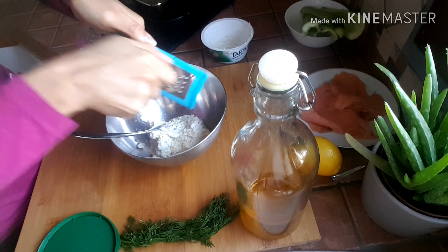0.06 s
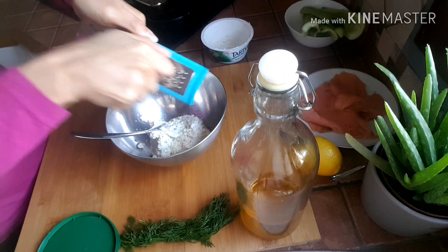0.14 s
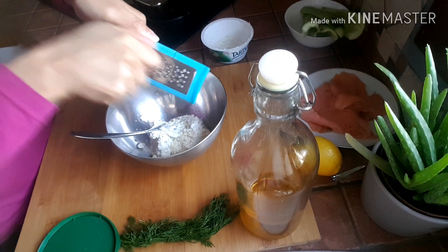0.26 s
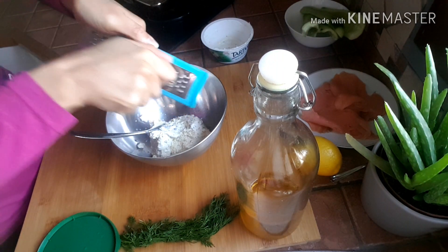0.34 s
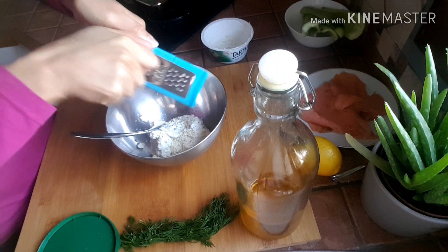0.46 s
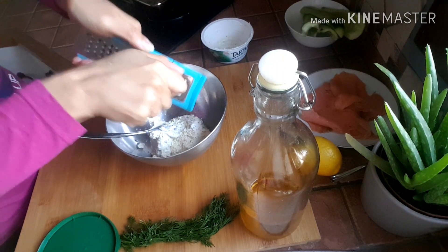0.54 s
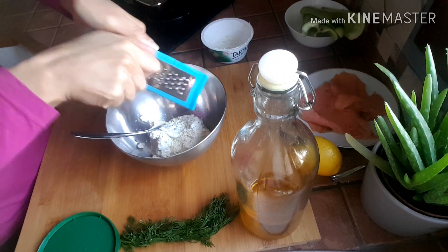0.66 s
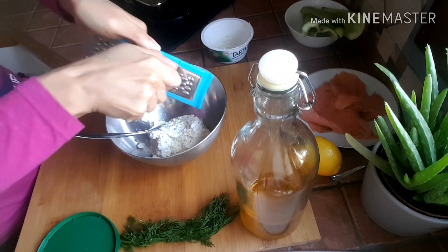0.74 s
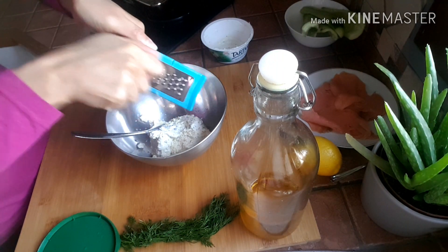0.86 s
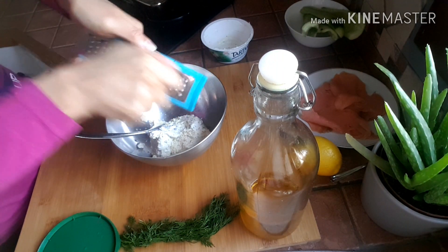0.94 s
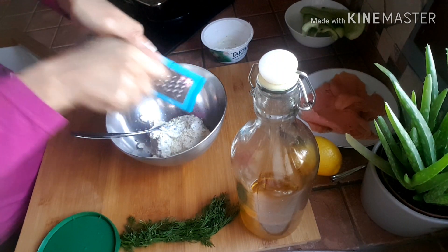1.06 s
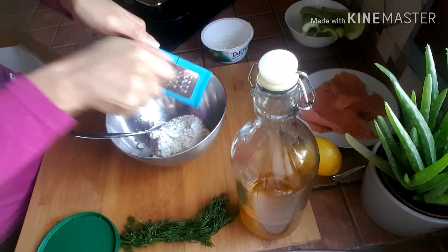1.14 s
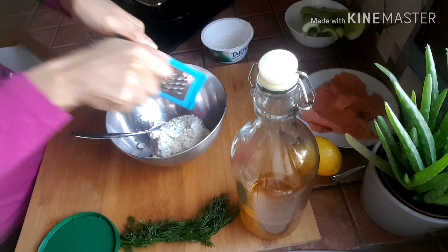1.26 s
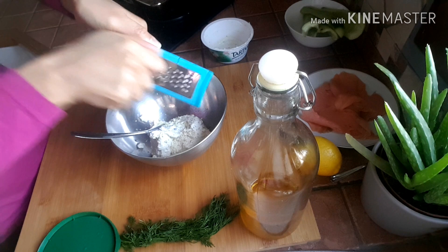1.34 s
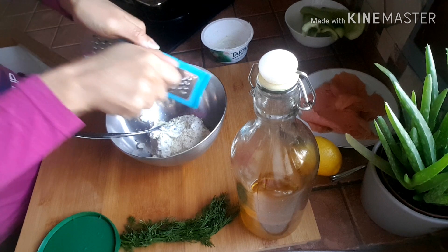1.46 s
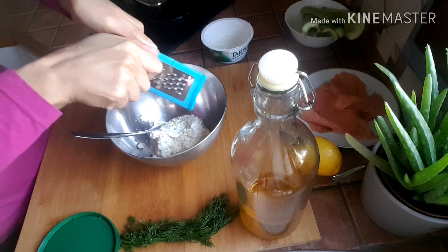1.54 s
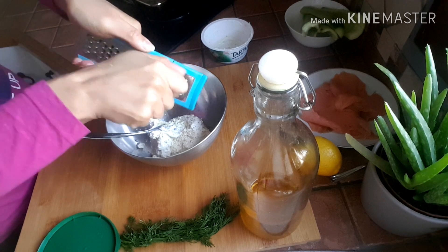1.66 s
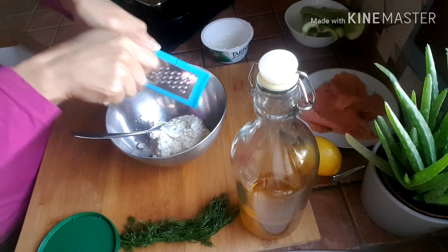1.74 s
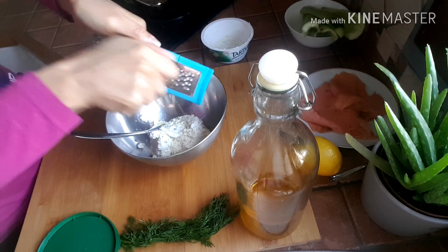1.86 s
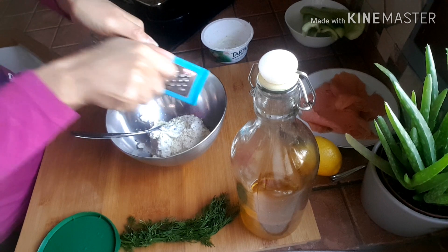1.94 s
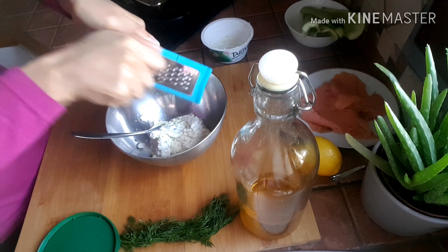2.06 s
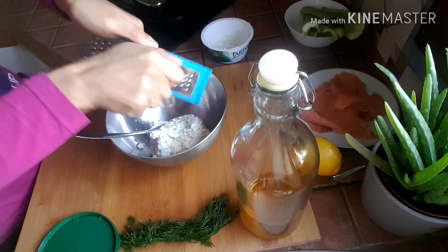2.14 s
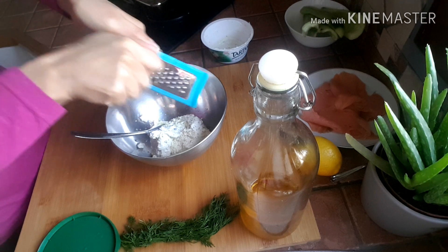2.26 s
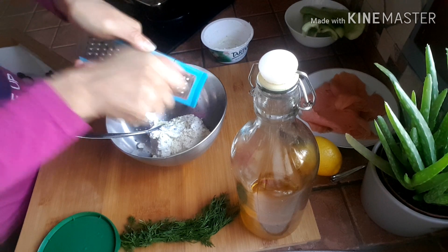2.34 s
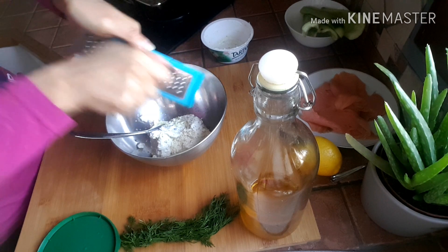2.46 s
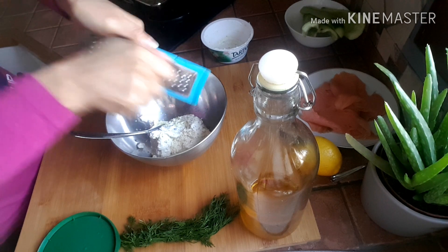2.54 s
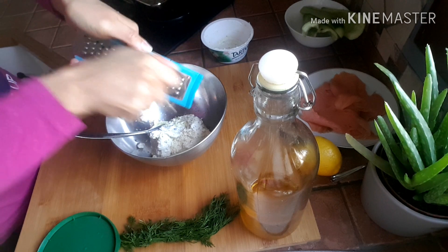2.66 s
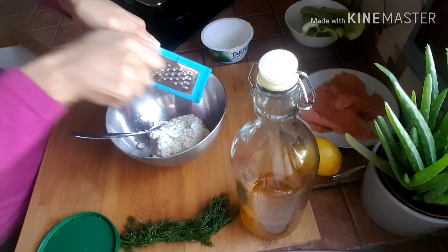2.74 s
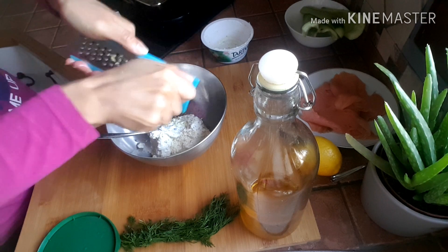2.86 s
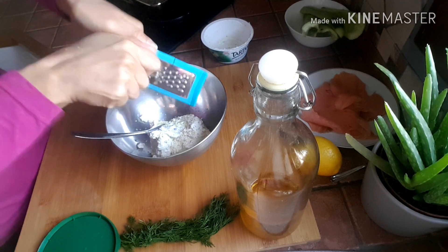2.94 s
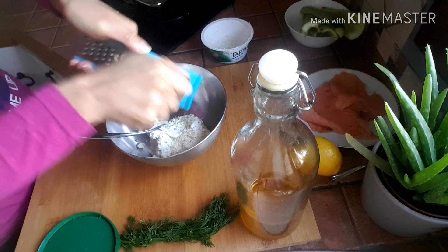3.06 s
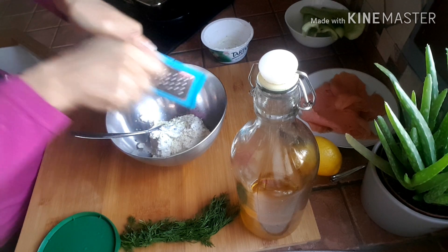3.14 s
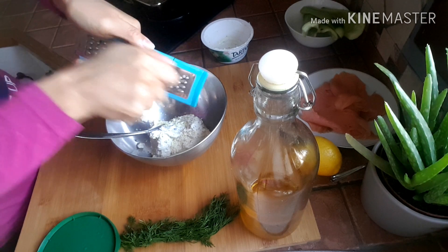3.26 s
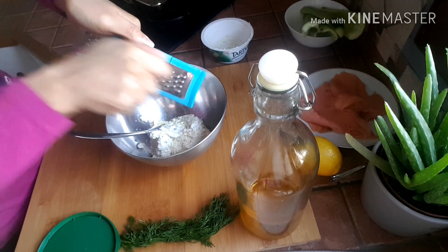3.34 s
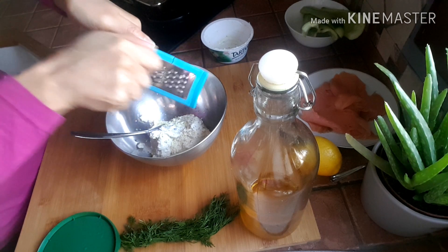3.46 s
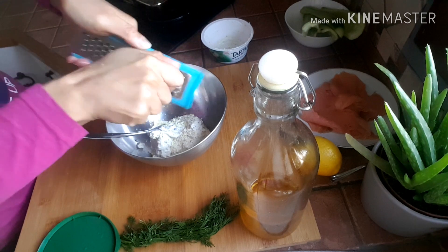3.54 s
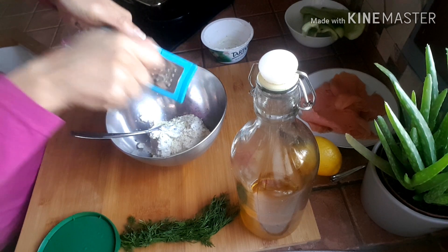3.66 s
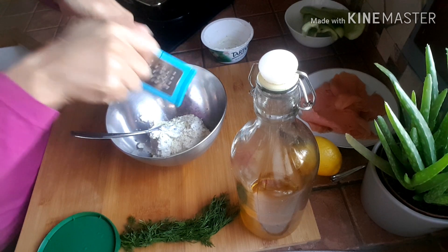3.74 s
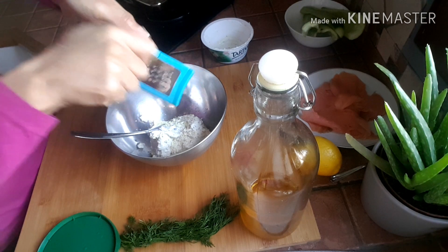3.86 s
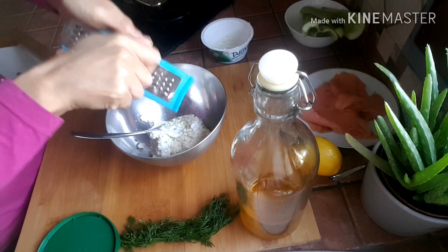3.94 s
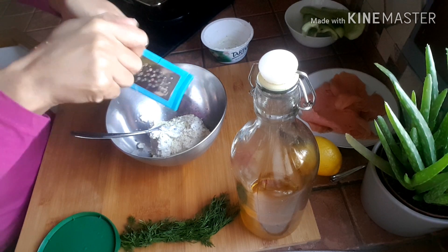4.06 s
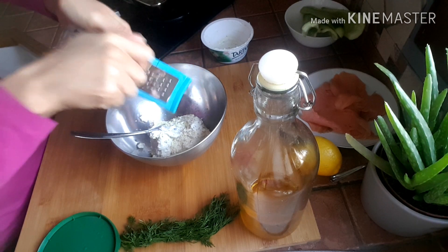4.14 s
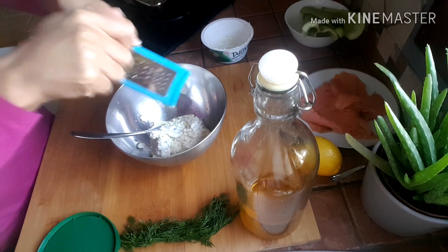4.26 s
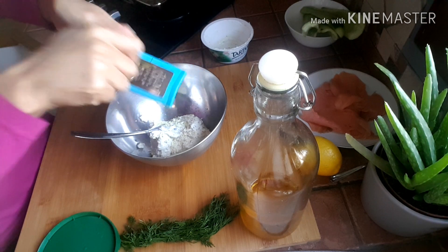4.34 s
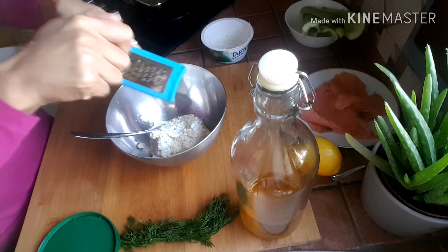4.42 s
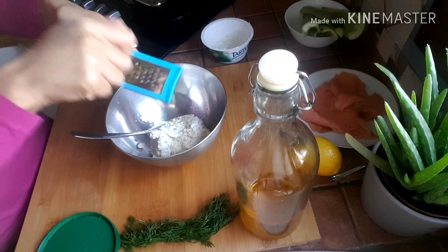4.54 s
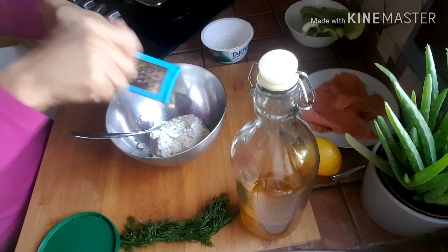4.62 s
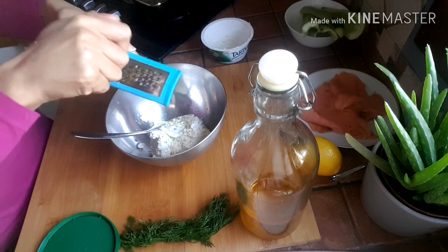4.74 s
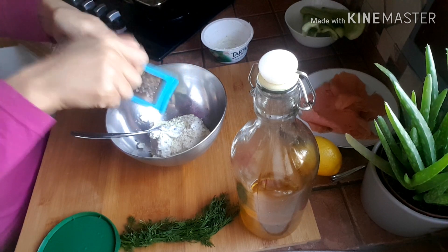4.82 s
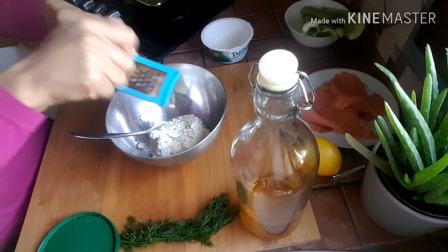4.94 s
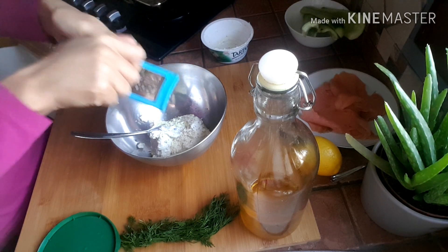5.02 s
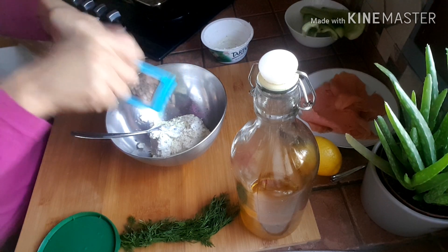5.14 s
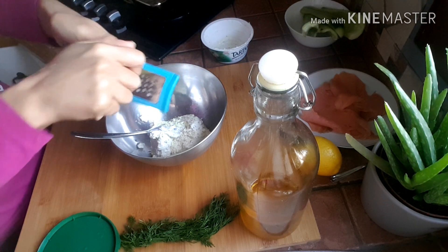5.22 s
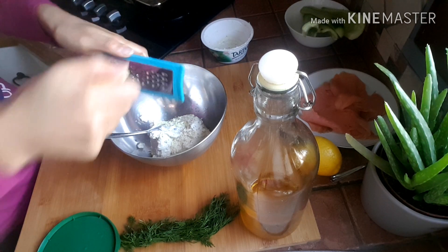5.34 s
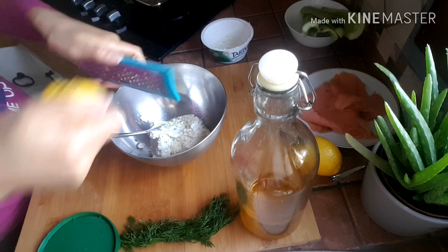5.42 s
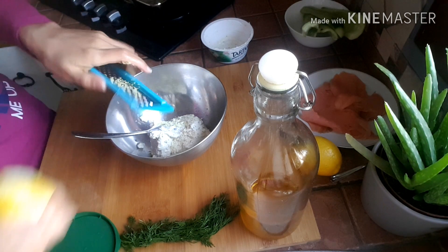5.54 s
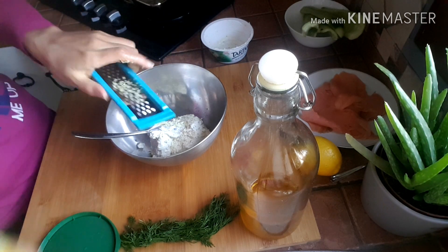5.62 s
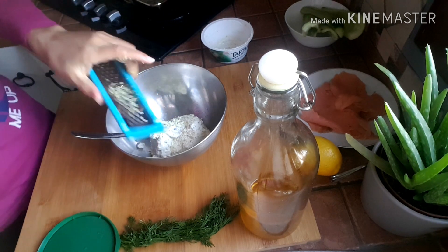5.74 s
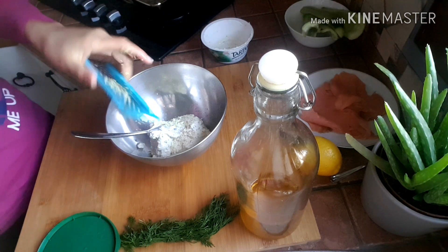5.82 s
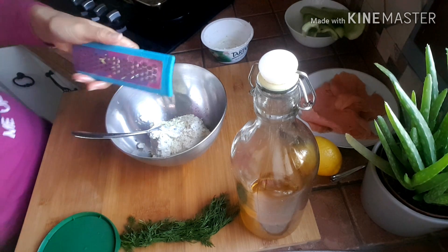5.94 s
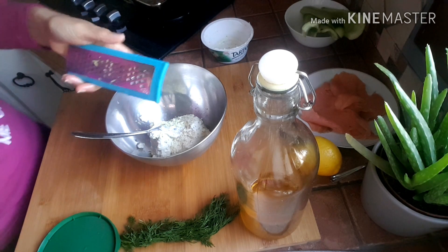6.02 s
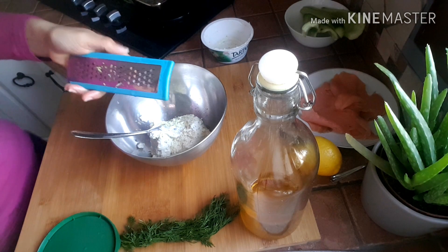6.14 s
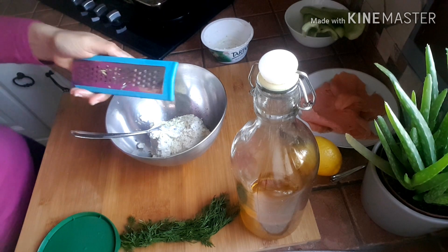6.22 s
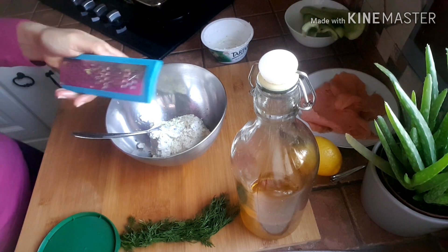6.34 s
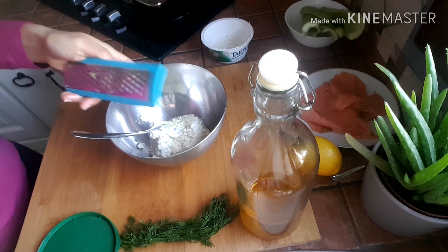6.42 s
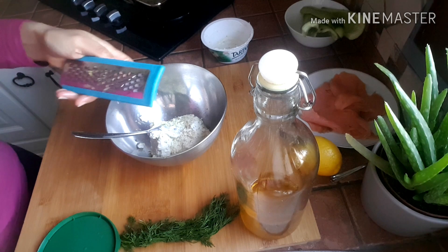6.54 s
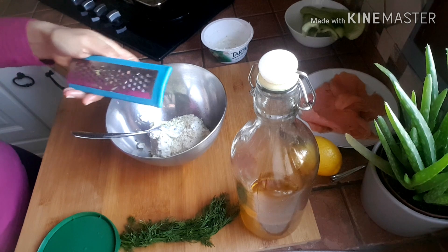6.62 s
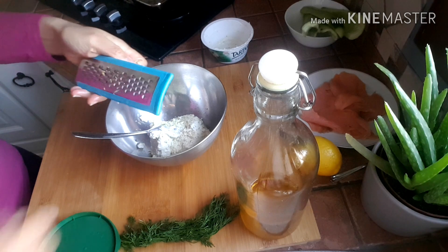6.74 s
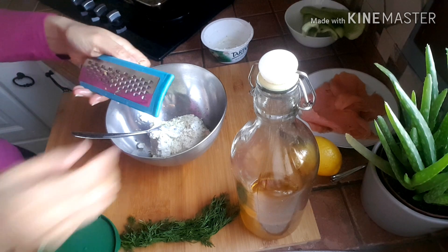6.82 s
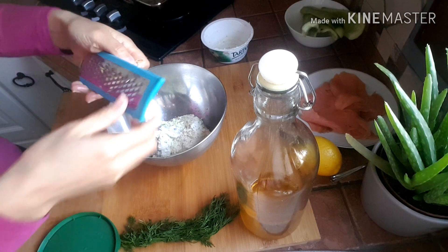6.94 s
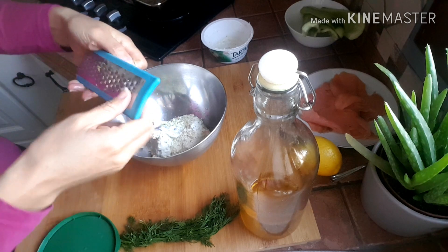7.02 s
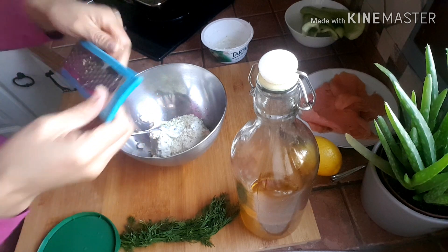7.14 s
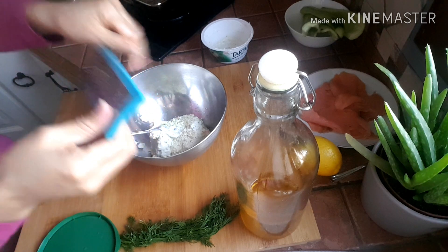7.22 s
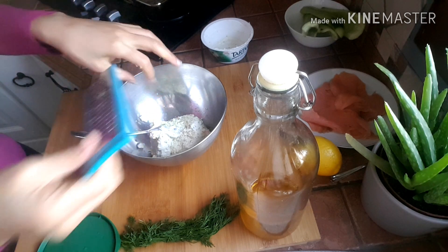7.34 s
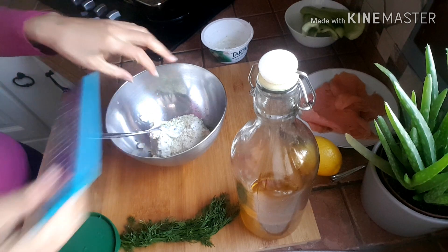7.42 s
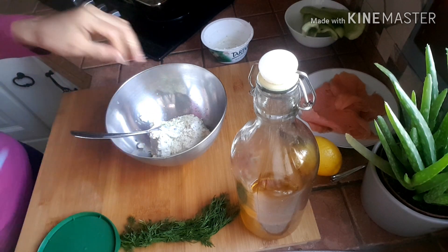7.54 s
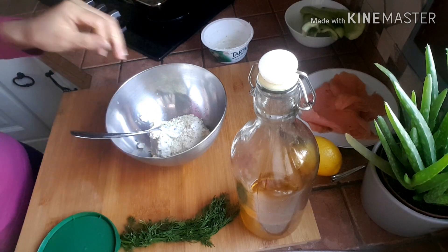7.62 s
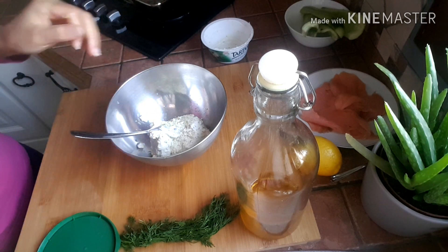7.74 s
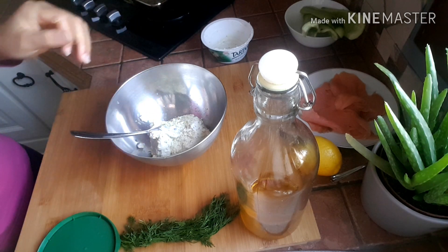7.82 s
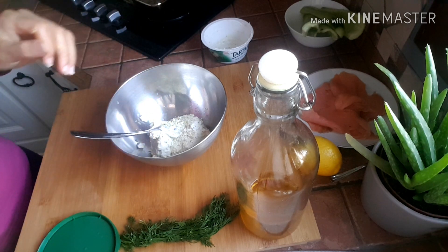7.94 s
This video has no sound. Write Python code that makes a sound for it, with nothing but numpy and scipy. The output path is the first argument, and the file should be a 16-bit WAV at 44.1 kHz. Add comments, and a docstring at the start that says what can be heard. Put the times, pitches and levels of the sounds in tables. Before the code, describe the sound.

Close in a quiet kitchen, a lemon scrapes down a metal hand grater in rapid, gritty strokes, about four a second, with sharp snags. Then light, dry taps knock against the grater at a steady pace. After a short gap the fruit lands on a wooden board with a dull thud and tiny rocking bumps, followed by soft cloth rustle and finger brushes over faint hum.

```python
"""In a quiet kitchen a lemon is pushed down a hand grater over a steel bowl, about four strokes a second. The
rind tears in dense random clicks, with sharper snags, that excite resonances of plate and fruit. The lemon is
then tapped on the grater and put down on a wooden board with a thud: damped modes ring. Cloth rustles as dense,
nearly even clicks, fingers brush the teeth as bands of noise, and an appliance hums as wavering sines over room
noise. Dense, decaying echoes answer the grating, the taps and the thud."""
import sys
import numpy as np
from scipy import signal
from scipy.fft import rfft, irfft
from scipy.io import wavfile

SR = 44100
rng = np.random.default_rng(int(sys.argv[2]) if len(sys.argv) > 2 else 0)


def transcribe(u):
    """Save the signal u as a 16-bit wav file named by the first command-line argument.

    u: samples, shape (n,) or (channels, n), limited to [-1, 1]; the rate is SR.
    q: integer samples, one column per channel.
    """
    v = np.clip(np.atleast_2d(u).T, -1, 1)
    q = np.round(v * 32767).astype(np.int16)
    wavfile.write(sys.argv[1], SR, q)


N = 351918

# left-right correlation of the diffuse sound in the room: frequency_hz, correlation
LIKENESS = [(60, 0.94), (125, 0.84), (250, 0.33), (600, 0.31), (2000, 0.046), (12000, 0.059)]


def amp(db):
    """Level in decibels to amplitude ratio."""
    return 10 ** (np.asarray(db) / 20)


def rms_one(x):
    """Normalisation to unit root-mean-square."""
    return x / np.sqrt(np.mean(x ** 2) + 1e-20)


def at_hz(points, hz):
    """Linear interpolation of a table on a logarithmic frequency axis."""
    table = np.array(points)
    return np.interp(np.log(hz), np.log(table[:, 0]), table[:, 1])


def butter(order, hz, kind="low"):
    """Butterworth filter: a maximally flat passband."""
    return signal.butter(order, hz, kind, fs=SR, output="sos")


def colour(x, spectrum):
    """Minimum-phase filter by the folded cepstrum: nothing sounds early, and white noise keeps its rms."""
    grid_hz = np.linspace(1, SR / 2, 4097)
    cepstrum = irfft(np.log(amp(at_hz(spectrum, grid_hz))))
    cepstrum[1:4096] *= 2
    cepstrum[4097:] = 0
    impulse = irfft(np.exp(rfft(cepstrum)))
    impulse = impulse / np.linalg.norm(impulse)
    return signal.fftconvolve(np.atleast_2d(x), impulse[None], axes=1)[:, :N]


def drift(rate_hz):
    """Slow random fluctuation: white noise through two equal real poles, scaled to unit spread."""
    r = np.exp(-2 * np.pi * rate_hz / SR)
    noise = rng.standard_normal(N + SR)
    return rms_one(signal.lfilter([1], [1, -2 * r, r * r], noise)[SR:])   # the first second settles


def ring(clicks, hz, t60_s):
    """Damped resonator: a unit click starts a decaying sine of unit initial height."""
    r, w = amp(-60 / (t60_s * SR)), 2 * np.pi * hz / SR
    return signal.lfilter([0, np.sin(w)], [1, -2 * r * np.cos(w), r * r], clicks + 1e-18)


def train(times_s, gains):
    """Impulse train: one click at each given time."""
    out = np.zeros(N)
    out[(np.asarray(times_s) * SR).astype(int)] = gains
    return out


def decays(times_s, gains, t60_s):
    """Exponential decay: an envelope that jumps at each time and dies away."""
    return signal.lfilter([1], [1, -amp(-60 / (t60_s * SR))], train(times_s, gains) + 1e-18)


def correlated(mid, side, alike):
    """Sum and difference of independent signals: a stereo pair with the given correlation."""
    return np.sqrt(1 + alike) * mid + np.sqrt(1 - alike) * side * [[1], [-1]]


def tearing(per_s, spread_db, alike):
    """Random impulse noise: uneven clicks at chance times, only partly common to both sides."""
    sizes = amp(spread_db * np.minimum(rng.exponential(1, (2, N)), 4))
    signed = sizes * rng.choice([-1, 1], (2, N))
    mid, side = signed * (rng.random((2, N)) < per_s / SR)
    return rms_one(correlated(mid, side, alike))


def grating():
    """Excitation and resonance: torn rind clicks directly, rings the plate and, duller, the fruit."""
    # spectrum of the rasp, relative: frequency_hz, level_db (per Hz)
    rasp_spectrum = [(530, -31), (900, -5.5), (1400, 0), (2000, -2.5), (2800, -2), (3800, -4.5), (4800, -9),
                     (6000, -1), (7400, -5), (8200, -5.5), (9200, -19.5), (10500, -15), (13000, -11.5),
                     (14300, -11), (15300, -57), (16000, -30)]
    # spectrum of the fruit's body, relative: frequency_hz, level_db (per Hz)
    fruit_spectrum = [(90, -11.5), (170, -4.5), (300, -9.5), (500, -3.5), (900, 1), (1400, -5.5),
                      (2200, -9)]
    rasp, dug, body = strokes()
    rows_of_teeth = amp(1.8 * drift(90))   # pressure jumps as the rind rides over the rows
    clicks = tearing(per_s=7000, spread_db=2, alike=0.17) * rows_of_teeth
    torn = rasp * clicks + snags()
    rasping = colour(torn + plate(torn), rasp_spectrum)
    lower = signal.sosfilt(butter(1, 1900), rasping)
    dug_rasp = rasping + (dug - 1) * lower
    fruit = colour((body * clicks).mean(axis=0), fruit_spectrum)
    return dug_rasp + amp(6) * fruit


def strokes():
    """Force envelopes of rasp, its lower part and the fruit: bite, stall, push, release, light return."""
    # strokes; levels before the resonances, the last one reached as the turn begins:
    # start_s, push_s, bite_db, push_end_db, stall_db (against the push), return_start_db, return_end_db
    stroke_rows = [(-0.13, 0.067, -45, -33, 0, -46.5, -51.5), (0.088, 0.033, -36, -41, -0.5, -57.5, -63),
                   (0.321, .04, -35.5, -37.5, -5, -52.5, -62), (0.54, 0.05, -38.5, -31.5, -1.5, -58, -56),
                   (0.752, 0.033, -36.5, -33, -13, -53, -62), (0.972, 0.052, -50.5, -35, -0.5, -53, -55.5),
                   (1.183, .046, -41, -36, -13, -67, -60.5), (1.414, .058, -38.5, -33, -4, -54, -60),
                   (1.647, 0.05, -47, -33.5, -0.5, -73, -52.5), (1.85, 0.068, -41.5, -35, -11, -46.5, -60),
                   (2.119, .052, -44.5, -32.5, -12.5, -57, -58),
                   (2.364, .06, -43.5, -34.5, 0, -51.5, -54.5), (2.59, 0.062, -38, -35, -2, -54.5, -53.5),
                   (2.811, 0.077, -43.5, -37, 2.5, -53.5, -53.5), (3.044, 0.068, -48, -37, 1, -58, -54),
                   (3.272, 0.055, -40.5, -39, 2.5, -62, -57.5),
                   (3.49, 0.093, -51.5, -38.5, -0.5, -42.5, -80.5)]
    last_return_end_s = 3.867
    bite_s, release_db_per_s = 0.0059, 534   # the push bites at once and lets go quickly
    turn_s, turn_db = 0.075, -8   # the hand stops to turn before each push, and the return fades
    stall_share = 0.69   # the fruit sticks this far into the push, then jerks on
    dig_db, dig_s = -4.5, 0.018   # the teeth first skim the rind: the lower rasp comes in late
    body_push_db, body_return_db = -9, -4.5   # body of the fruit against the rasp
    t, push, back, dug = np.arange(N) / SR, np.zeros(N), np.zeros(N), np.ones(N)
    nexts = [row[0] for row in stroke_rows[1:]] + [last_return_end_s]
    for row, following in zip(stroke_rows, nexts):
        s, length, bite_db, end_db, stall_db, back_db, last_db = row
        end = s + length
        at = (t >= s) & (t < following)
        now = t[at]
        pressed_db = np.interp(now, [s, end], [bite_db, end_db])
        pressed_db += np.interp(now, [s, s + stall_share * length, end], [0, stall_db, 0])
        pressed_db -= release_db_per_s * np.maximum(now - end, 0)
        push[at] = amp(pressed_db) * np.minimum((now - s) / bite_s, 1)
        back_times = [s, end, following - turn_s, following]
        back[at] = amp(np.interp(now, back_times, [last_db, back_db, last_db, last_db + turn_db]))
        dug[at] = amp(dig_db * np.exp((s - now) / dig_s))
    body = dug * (amp(body_push_db) * push + amp(body_return_db) * back)
    return push + back, dug, body


def snags():
    """Stick and slip: a row of teeth bites and lets go in a sharp click with a short decaying tear."""
    # snags, before the plate rings: time_s, level_db, treble_db (against level_db)
    snag_rows = [(0.0773, -42, 2), (0.0963, -26.5, 5), (0.119, -33, 1), (0.3143, -42.5, 2),
                 (0.3284, -31.5, -2.5), (0.3573, -37, 11), (0.3616, -21, -7.5), (0.5462, -34, -4),
                 (0.5824, -31.5, 9.5), (0.7562, -38, 3), (0.785, -26, 2), (0.974, -44.5, 5),
                 (1.003, -37, 6), (1.0195, -27, 1), (1.109, -36.5, -6), (1.193, -36, -14),
                 (1.222, -30, -12), (1.407, -34, -4), (1.4232, -33, 9), (1.4671, -37, -3), (1.6617, -34, 4),
                 (1.7, -34.5, 11.5), (1.857, -34.5, 6.5), (1.902, -25, -8), (1.914, -29.5, 8),
                 (1.9522, -39, 7), (2.1252, -36.5, -22), (2.1681, -33, 10.5), (2.3699, -36, -3),
                 (2.4, -36, -1), (2.593, -31, 6), (2.6559, -35, 10), (2.814, -45, -6), (2.845, -32, 8),
                 (3.055, -37, -11), (3.277, -46, 1), (3.292, -24, 1), (3.3327, -31, 4), (3.496, -39, -9),
                 (3.5291, -28, -8), (3.5431, -23, 3), (3.576, -29.5, 3), (3.59, -29, 0)]
    t60_s = 0.013
    s, level_db, treble_db = np.transpose(snag_rows)
    pan_db = 4.5 + 5 * rng.standard_normal(len(s))   # left over right: where on the plate is chance
    snap = tearing(per_s=29000, spread_db=5, alike=1)
    snap[:, (s * SR).astype(int)] = 1.77   # the letting go is one sharp click
    dull = signal.sosfilt(butter(2, 4800), snap)
    bright = snap - dull
    sides = []
    for k, way in enumerate([1, -1]):
        side_db = level_db + way * pan_db / 2
        dull_part = dull[k] * decays(s, amp(side_db), t60_s)
        bright_part = bright[k] * decays(s, amp(side_db + treble_db), t60_s)
        sides.append(dull_part + bright_part)
    return np.array(sides)


def plate(torn):
    """Modal superposition: plate modes of alternating sign, each with a half-power width."""
    # modes of the toothed plate: frequency_hz, width_hz, level_db (relative)
    plate_modes = [(1370, 200, -9), (1950, 200, -7), (2350, 180, -8), (2780, 200, -4), (3300, 250, -7),
                   (3950, 250, -6), (5370, 400, -5), (6300, 400, -7), (7280, 350, -9), (10700, 500, -6),
                   (12300, 500, -8)]
    out = 0
    for k, (hz, width_hz, level_db) in enumerate(plate_modes):
        free = amp(level_db + 4 * drift(6))   # the moving fruit damps now one mode, now another
        t60_s = np.log(1000) / np.pi / width_hz
        out = out + (-1) ** k * 2 * np.pi * width_hz / SR * ring(free * torn, hz, t60_s)
    return out


def struck(s, level_db, treble_db, modes, knee_hz, longest_s):
    """Modal excitation: each blow strikes each mode by chance; treble_db weights the high modes."""
    luck_db = rng.normal(0, 1.5, (len(s), len(modes)))
    out = np.zeros((2, N))   # low modes, high modes
    for k, (hz, mode_db, t60_s) in enumerate(modes):
        high = int(hz > knee_hz)
        gains = amp(level_db + mode_db + luck_db[:, k] + high * treble_db)
        blows = train(s, -gains * (-1) ** (k * high))
        out[high] += ring(blows, hz, min(t60_s, 0.015 if high else longest_s))
    return out


def taps():
    """Impact: the rind knocks on the frame: short modes, one sharp click and a little grit after it."""
    # taps, before modes and filters: time_s, level_db, treble_db (against level_db); the last row is no knock
    # but a faint, bright tick that sounds with the scratch of the teeth at 5.42 s
    tap_rows = [(3.838, -45.5, -22), (3.992, -35, -15), (4.162, -38, -18.5), (4.348, -32, -9.5),
                (4.526, -32.5, -17), (4.701, -29.5, -14), (4.873, -31, -10.5), (5.041, -34, -12),
                (5.213, -31, -5.5), (5.425, -59.5, 6)]
    # modes of the frame, undamped by the hand: frequency_hz, level_db (relative), t60_s
    frame_modes = [(344, -15, 0.046), (467, 2, 0.054), (830, 8, 0.0045), (1295, 5, 0.031),
                   (1580, -8, 0.011), (2454, 7, 0.031), (3030, 1.5, 0.02), (3500, 2, 0.006),
                   (4830, -18, 0.0066), (5700, -4, 0.01)]
    # spectrum of click and grit, relative: frequency_hz, level_db (per Hz)
    crack_spectrum = [(150, -14), (600, -6.5), (3000, 0.5), (7000, -11), (9200, -20.5), (12000, -16),
                      (16000, -46)]
    s, level_db, treble_db = np.transpose(tap_rows)
    grit = rng.standard_normal(N) * decays(s, amp(level_db + treble_db + 1), 0.025)
    click = train(s, -amp(level_db + treble_db + 9))
    # the hand damps the frame, so no mode outlasts longest_s
    modes = struck(s, level_db - 16, treble_db + 8.5, frame_modes, knee_hz=2000, longest_s=0.035)
    return modes.sum(axis=0) + colour(click + grit, crack_spectrum)[0]


def thud():
    """Contact time: the squashing fruit smooths the low modes; weaker blows are softer, so duller."""
    # lemon lands on the board and rocks, before the modes: time_s, level_db
    thud_rows = [(6.3809, -21.5), (6.3933, -23.5), (6.413, -31), (6.433, -37), (6.45, -37.5), (6.478, -43),
                 (6.512, -43), (6.544, -54), (6.58, -55), (6.652, -59)]
    # modes of the board, before the limit on decay: frequency_hz, level_db (relative), t60_s
    board_modes = [(90.4, -16, 0.25), (173, -6.5, 0.041), (246, 3.5, 0.018), (360, 2, 0.023),
                   (470, -4, 0.022), (695, -9.5, 0.017), (1010, -10.5, .02), (1340, -8.5, 0.0098),
                   (1640, -8.5, 0.011), (2100, -11, 0.0052)]
    s, level_db = np.transpose(thud_rows)
    hardness_db = 2.1 * (level_db - level_db[0])
    low, high = struck(s, level_db - 3.5, hardness_db, board_modes, knee_hz=500, longest_s=0.19)
    squash = np.hanning(round(0.0032 * SR))   # the length of the contact
    swollen = signal.lfilter(-squash / squash.sum(), [1], low)
    swollen = signal.sosfilt(butter(2, 85, "high"), swollen)   # a small board radiates little deep bass
    burst = rng.standard_normal(N) * decays(s, amp(level_db + hardness_db - 16.5), 0.074)
    crack = signal.sosfilt(butter(4, [600, 2500], "band"), burst)
    return swollen + high + crack


def rustle():
    """Friction noise: cloth and skin click at random under a moving level; the fruit scrapes on the board."""
    # cloth and skin moving, mean level: time_s, level_db
    rustle_rows = [(3.7, -75.5), (4.1, -68), (5.3, -77), (5.55, -70.5), (5.72, -72.5), (5.8, -66),
                   (5.87, -64), (6.1, -82), (6.37, -73), (6.5, -63.5), (6.7, -66.5), (7.0, -70),
                   (7.05, -79), (7.98, -74)]
    # scuffs of the fruit scraping on the board as it settles: time_s, level_db
    scuff_rows = [(6.432, -58), (6.449, -56.5)]
    # spectrum of cloth, relative: frequency_hz, level_db (per Hz)
    cloth_spectrum = [(300, -6.5), (700, -3), (2000, -4), (2700, -5.5), (3400, -11.5), (6000, -19.5),
                      (10000, -23)]
    s, level_db = np.transpose(rustle_rows)
    gain = amp(np.interp(np.arange(N) / SR, s, level_db, left=-90) + drift(1.6))
    s, level_db = np.transpose(scuff_rows)
    gain = gain + decays(s, amp(level_db), 0.13)
    return gain * colour(tearing(per_s=6000, spread_db=0.5, alike=0.055), cloth_spectrum)


def brushes():
    """Band-limited noise: fingers and rind brush the teeth in dying bursts of at most 0.2 s."""
    # brushes, before the band filter: time_s, level_db (3.5 dB above the burst), centre_hz, t60_s
    brush_rows = [(3.804, -62, 8500, 0.023), (3.899, -53.5, 8000, 0.046), (4.163, -50, 7450, 0.19),
                  (4.378, -51.5, 8000, 0.11), (5.154, -54, 5500, 0.022), (5.424, -46, 4050, 0.22),
                  (6.435, -56, 3500, 0.13), (7.128, -62, 6000, .05), (7.14, -54, 5550, .06),
                  (7.224, -62, 6500, .06), (7.268, -56.5, 6200, 0.074), (7.284, -63, 7500, 0.04),
                  (7.42, -56, 9570, .04)]
    out = np.zeros((2, N))
    noise = rng.standard_normal((2, N))
    for s, level_db, hz, t60_s in brush_rows:
        at = slice(int(s * SR), int((s + 0.2) * SR))
        band = signal.sosfilt(butter(1, [hz / 1.35, hz * 1.35], "band"), noise[:, at])
        out[:, at] += band * decays([s], amp(level_db - 3.5), t60_s)[at]
    return out


def kitchen(x):
    """Reverberation: octave bands of noise rise in about a millisecond and decay, alike in the bass."""
    # reverberation time: frequency_hz, t60_s
    reverberation = [(60, 0.15), (500, 0.35), (2000, 0.26), (6000, 0.19), (14000, 0.1)]
    t, out = np.arange(SR // 2) / SR, 0
    mid, side = rng.standard_normal((2, SR // 2))
    for low_hz in 40 * 2. ** np.arange(9):
        centre_hz = low_hz * 2 ** .5
        both = correlated(mid, side, at_hz(LIKENESS, centre_hz))
        band = signal.sosfilt(butter(2, [low_hz, 2 * low_hz], "band"), both)
        out = out + band * amp(-60 * t / at_hz(reverberation, centre_hz))
    out = out * np.minimum(t / 0.0011, 1)
    return signal.fftconvolve(x[None], out / np.linalg.norm(out[0]), axes=1)[:, :N]


def hum():
    """Narrow-band tones: an appliance's sines waver in level and phase."""
    # tones of the appliance, mean level: frequency_hz, level_db
    hum_tones = [(102.3, -70), (123.8, -79.5), (247.6, -76.5), (296.1, -73.5)]
    t, out = np.arange(N) / SR, 0
    for hz, level_db in hum_tones:
        cycles = hz * t + 0.26 * drift(1.26)
        out = out + amp(level_db + 4.5 * drift(5.9)) * np.sin(2 * np.pi * cycles)
    return out


def air():
    """Diffuse field: shaped room noise whose two sides are correlated in the bass."""
    # spectrum of the room noise, relative: frequency_hz, level_db (per Hz)
    air_spectrum = [(20, -22), (32, -13), (53, -1), (100, -5), (150, -5), (300, -13), (520, -14.5),
                    (1160, -24), (2000, -27), (4000, -34), (7000, -37), (9200, -41), (12500, -36),
                    (16000, -36.5)]
    # balance of left against right: frequency_hz, level_db
    air_lean = [(30, 3.5), (125, 1.3), (300, -2.5), (2000, -4), (12000, 0)]
    side_points = []
    for hz, c in np.clip(LIKENESS, 0, [SR, .99]):
        side_points.append((hz, 10 * np.log10((1 - c) / (1 + c))))   # side against mid, dB
    grid_hz = np.fft.rfftfreq(N, 1 / SR) + 1
    mid, side = rfft(rng.standard_normal((2, N))) * amp(at_hz(air_spectrum, grid_hz))
    side = side * amp(at_hz(side_points, grid_hz))
    lean = amp(at_hz(air_lean, grid_hz) * [[.5], [-.5]])
    noise = rms_one(irfft((mid + side * [[1], [-1]]) * lean, N))
    return noise * amp(-62.5 + 0.18 * drift(2))


def arrive(near):
    """Arrival-time difference: the left lags 3 samples, but 1 in the top that glances off the bowl."""
    # left port against right, spectral shape: frequency_hz, level_db
    shadow_spectrum = [(300, 3), (1400, -2), (3000, 3.5), (6000, 6), (9000, 11), (15000, 6)]
    lower = signal.sosfiltfilt(butter(2, 7500), near[0])
    left = np.roll(lower, 3) + np.roll(near[0] - lower, 1)
    near[0] = amp(2) * colour(left, shadow_spectrum)[0]
    return near


def scene():
    """Superposition: direct sound, its echoes in the kitchen, the hands and the background."""
    rasp, knocks, drop = grating(), taps(), thud()
    near = arrive(rasp + knocks * amp([[-1.2], [1.2]]))
    dull_knocks = signal.sosfilt(butter(1, 3000), knocks)
    sent = amp(-7) * rasp.mean(axis=0) + amp(-1.5) * dull_knocks + amp(-2.5) * drop
    direct = near + drop * amp([[.6], [-.6]])
    return direct + kitchen(sent) + rustle() + brushes() + hum() + air()


def record(dry):
    """Band limitation: a steep low-pass, 60 dB down from 16.3 kHz up, cuts the top."""
    return signal.sosfilt(signal.cheby2(16, 60, 16300, fs=SR, output="sos"), dry)


dry = scene()
out = record(dry)
transcribe(out)
```